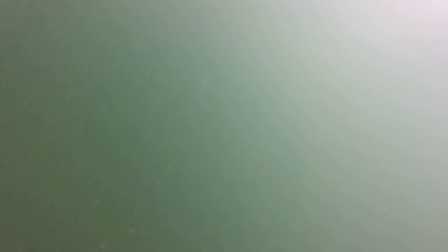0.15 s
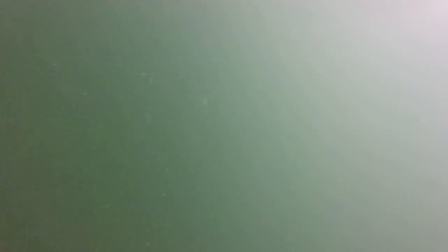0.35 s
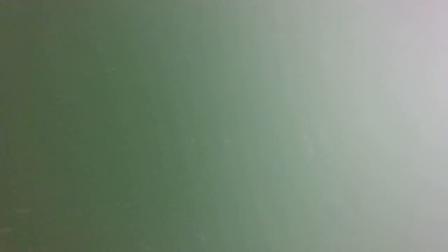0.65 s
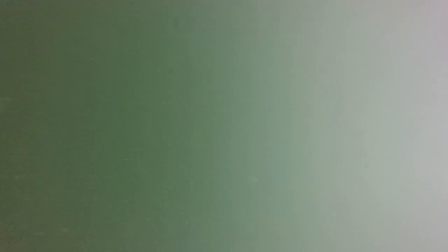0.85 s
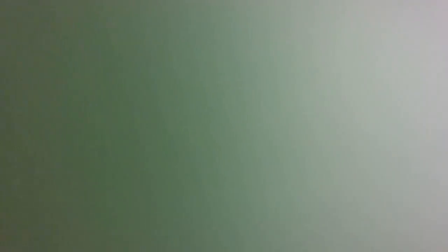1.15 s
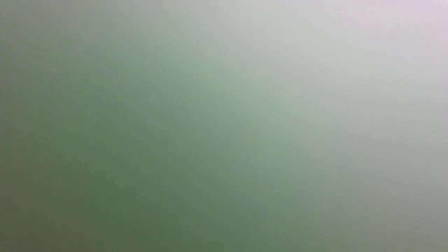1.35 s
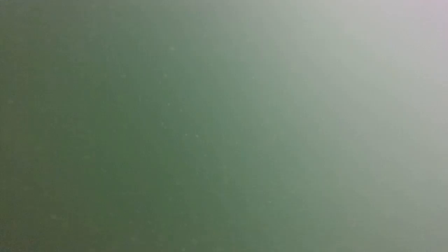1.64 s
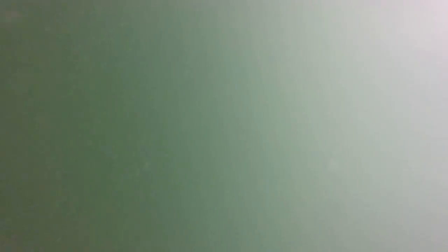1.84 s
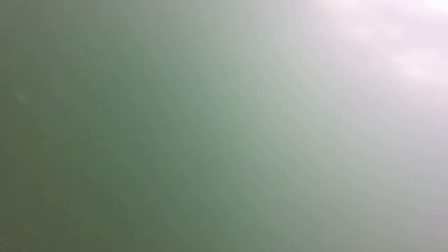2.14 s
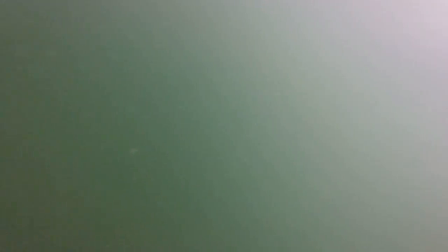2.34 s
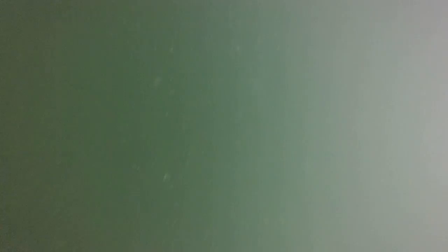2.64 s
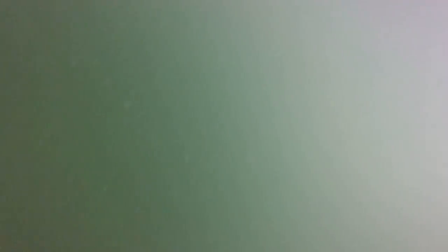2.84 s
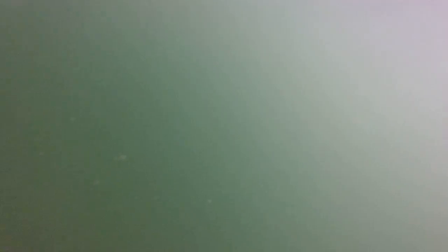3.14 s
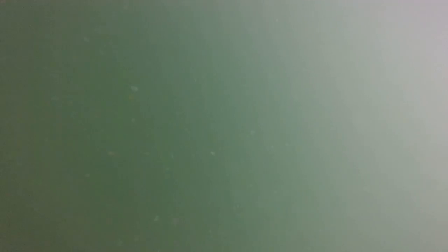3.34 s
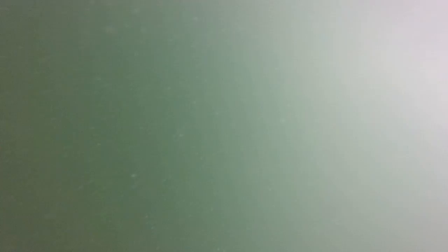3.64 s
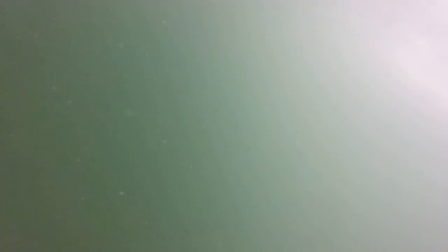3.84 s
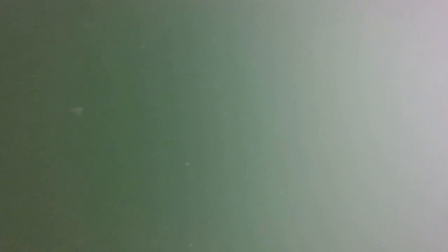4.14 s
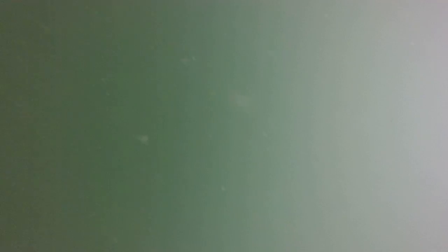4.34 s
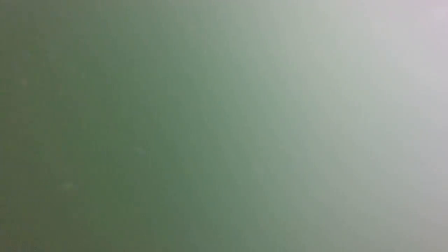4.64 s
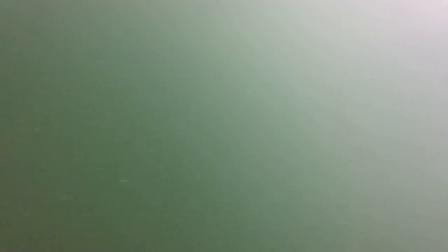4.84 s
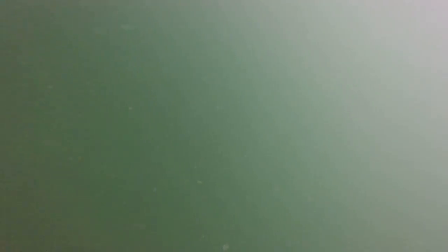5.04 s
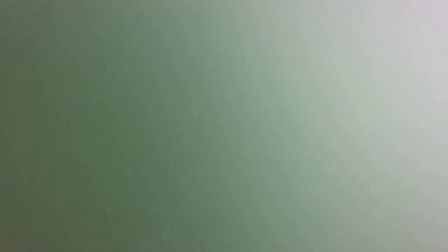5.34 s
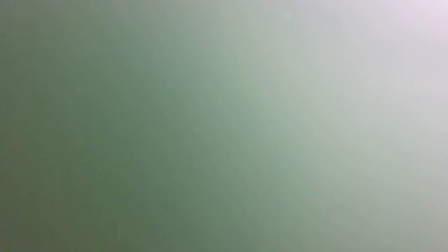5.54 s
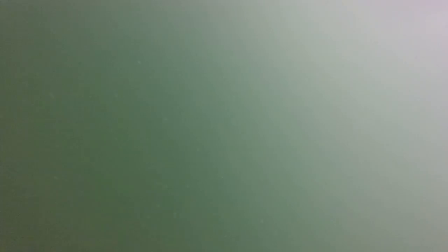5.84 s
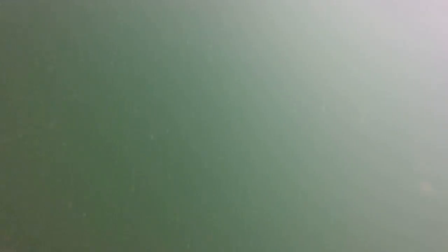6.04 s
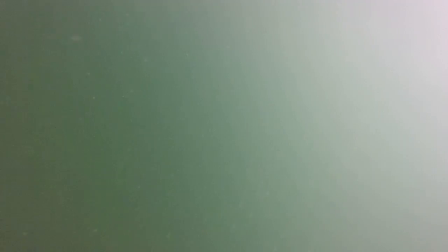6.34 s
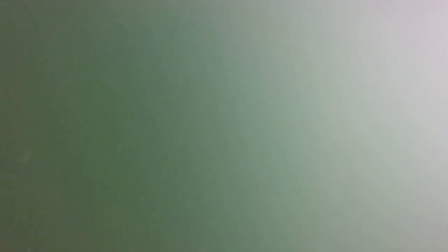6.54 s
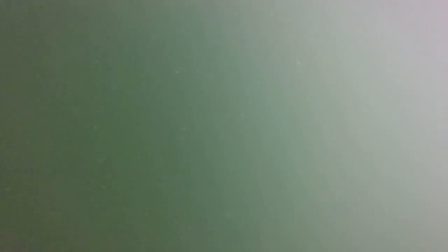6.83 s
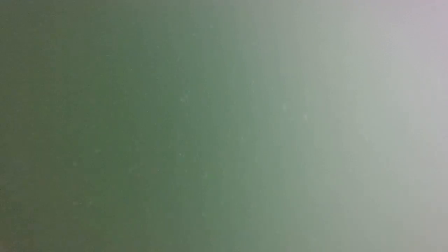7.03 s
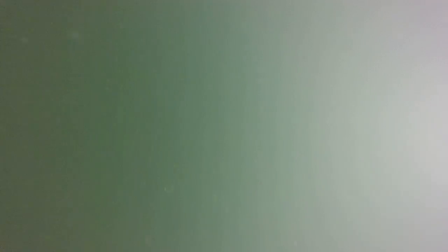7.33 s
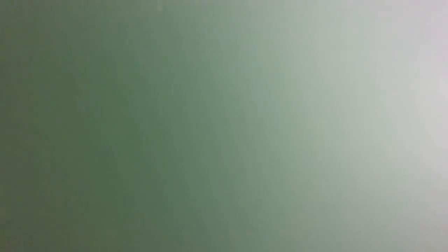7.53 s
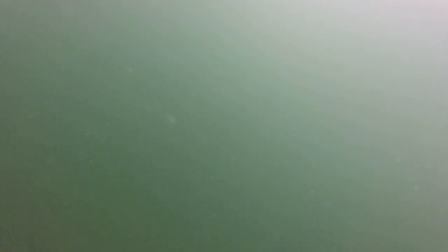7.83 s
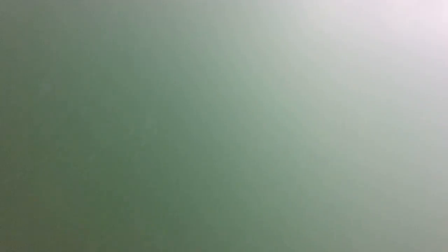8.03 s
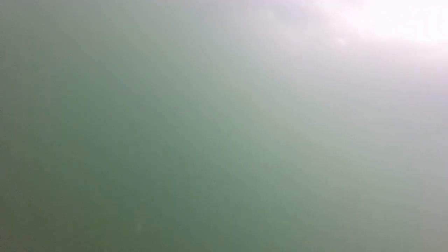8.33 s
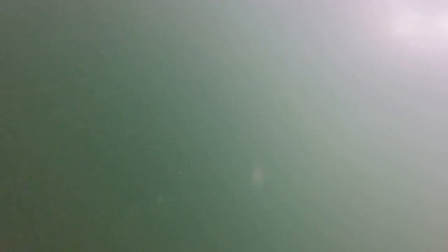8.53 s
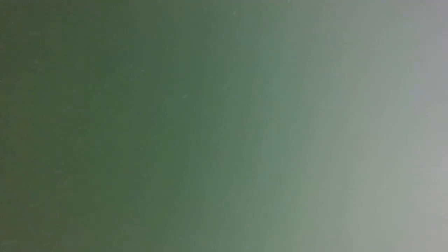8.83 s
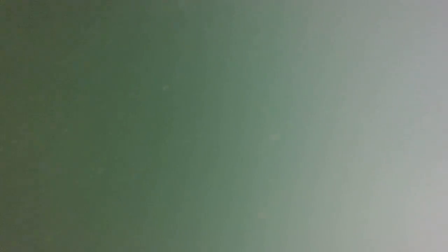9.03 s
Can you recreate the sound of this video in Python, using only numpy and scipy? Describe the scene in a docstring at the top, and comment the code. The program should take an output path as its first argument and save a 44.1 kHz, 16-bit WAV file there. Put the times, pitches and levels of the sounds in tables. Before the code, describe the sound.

Roughly nine seconds underwater off a pier, heard in mono through the wall of a waterproof case. Throughout, snapping shrimp make a dense, irregular crackle like frying fat: faint far ticks, thin bright clicks and nearer snaps with a brief, hard, boxy ring and ragged short scatter. Strong snaps stand out near 0.3, 2.4, 2.8, 3.6 and 5.6 s, the last two and the first loudest; others come singly or in tight clusters. The crackle swells and thins unevenly, busier around 2.2 and 3 s. Small rounded water gulps, low-mid and rising quickly in pitch, start near 1.5 s, with a clear one at 1.85 s, return from 3 s and become frequent between 6.5 and 8.2 s, with another at 8.7 s. Tiny gurgling plops, surging a little near 5 s, a dull low wash and a faint even hiss continue to the end.

```python
"""Snapping shrimp under a pier

A camera in a waterproof case hangs in the water. Shrimp crackle all around: each snap is a pressure
spike, trailed by noisy scatter from piles and seabed, that rings the modes of the case.
Small waves gulp at the surface as gliding sine bursts with a slosh of noise, over gurgling made of
tiny filtered plops. A dull wash of water and a faint hiss are steady coloured noise."""
import sys
import numpy as np
from scipy import signal
from scipy.fft import rfft, irfft, next_fast_len
from scipy.io import wavfile
from scipy.ndimage import map_coordinates

SR = 44100
rng = np.random.default_rng(int(sys.argv[2]) if len(sys.argv) > 2 else 0)


def unload_wav(signal):
    """Save mono or channel-first audio to the path in sys.argv[1] as 16-bit WAV at rate SR, clipped to [-1, 1]."""
    wavfile.write(
        sys.argv[1],
        SR,
        np.round(np.clip(np.atleast_2d(signal).T, -1, 1) * 32767).astype(np.int16),
    )


N = 404838  # samples

# near shrimp snaps: t/s, level/dB, treble lift/dB, upper against lower case modes/dB
NEAR_SNAPS = [(0.0101, -36.5, -18, -12.5), (0.103, -43, 12, 6), (0.113, -46.5, 8.5, -8),
              (0.276, -25.5, -2, -0.5), (0.4499, -34.0, 2.5, 0.5), (0.474, -49, 2.5, -2),
              (0.5032, -45.5, 4, 2), (0.634, -40.5, 13.5, -7.5), (0.8168, -36.0, -0.5, 4.5),
              (0.885, -42.0, -1, 2), (1.0494, -50, 13, -4), (1.2755, -43.5, 0, -4),
              (1.3113, -44.5, 3, -1.5), (1.3214, -45, 16.5, -3), (1.362, -51.5, 24, 0), (1.413, -42, 10, 0),
              (1.5077, -41.5, 2, 0), (1.8623, -46.5, 35, 4), (1.9822, -37.5, 14.5, -2),
              (2.0142, -43, 2, -1), (2.077, -42, -5, 2), (2.1619, -42.5, 5.5, -3), (2.3254, -42, 7, 10),
              (2.3796, -40.5, 0, 6), (2.4028, -29.0, -1, 0), (2.4168, -48, 20, 3), (2.4316, -42, 2, 0),
              (2.4513, -42.5, 4, -8), (2.495, -41.5, 3.5, 8), (2.5287, -42, 4, 7), (2.5396, -44, 4, -8),
              (2.7745, -30.5, 2, -6), (2.8242, -35.5, 1, -3), (2.9147, -43, 3, -9.5),
              (3.0219, -45.5, -1, -5), (3.0514, -41.0, 6.5, -23), (3.075, -47, 16, 11), (3.1332, -40, 0, 4),
              (3.183, -35.5, 5.5, 10), (3.251, -45.5, -14, -0.5), (3.2645, -45, 6, 7),
              (3.2995, -41.5, 14, -2), (3.4452, -36.0, 7, 7.5), (3.5592, -25, 1.5, -1),
              (3.6868, -45.5, 21, -11.5), (3.749, -48, 9, 2.5), (3.8095, -42, 6, -11),
              (3.858, -40, 1, -5.5), (3.8983, -45.0, 2, 0), (4.0254, -45, 4, 4), (4.2838, -46.5, 10, 2),
              (4.3923, -43, 3, 11), (4.5444, -36, 1.5, 0), (4.559, -38, -4, 1), (4.5873, -43.5, 3, 5),
              (4.6945, -40, 0, 6), (4.7349, -47, 5.5, -3), (4.7465, -36, -1, 8), (4.964, -46.5, 4, -8),
              (5.08, -46, 4, 2), (5.1316, -48, -1.5, 14), (5.341, -41.5, 4, -7), (5.398, -41.5, 6, 8),
              (5.4278, -41.5, 2, 2), (5.508, -40.5, 12.5, -5), (5.6293, -39.5, -5, -8),
              (5.6387, -24.5, -5, 7.5), (5.8876, -34, -1, 2.5), (5.913, -39, 5, 9), (6.1137, -44, 10, 8),
              (6.179, -38.5, 5.5, -8.5), (6.366, -41.5, 8, 3), (6.4081, -41.5, 5, 8), (6.4848, -42.5, 3, 6),
              (6.4952, -44, 4, -3), (6.5455, -45, 14.5, 6), (6.5623, -42, 1, 6), (6.9103, -39.5, 7.5, 4),
              (6.926, -43, 10.5, -4), (7.0494, -44.5, 11.5, -7), (7.184, -41.5, 15, -1),
              (7.2484, -36.5, 3, 6.5), (7.286, -45, -1, 2), (7.311, -41, 5, -16), (7.415, -34, -0.5, -3.5),
              (7.552, -40, 12, 7), (7.5641, -41, 12, -4.5), (7.6197, -47, 17, 17), (7.7423, -41.0, 6, -14),
              (7.9041, -39, -3, 2), (7.9552, -44, -1, 8), (7.9866, -34.5, -10, -15),
              (8.0032, -38.5, 2.5, 2), (8.1883, -40.5, 5, 4.5), (8.2183, -41.5, 6.5, 4),
              (8.4887, -43.5, -13, 12.5), (8.6812, -42.5, 11, -11), (8.802, -42, 19, 2),
              (8.9955, -47, 29, -5)]
# activity of the shrimp colony: t/s, crackle level/dB
COLONY_ACTIVITY = [(0.0, -54), (0.33, -61.5), (2.07, -57), (2.17, -54), (2.76, -63.5), (2.96, -55.5),
                   (4.34, -59.5), (4.73, -56), (5.01, -60.5), (6.26, -55.5), (6.62, -59), (8.54, -56.5),
                   (9.18, -58.5)]
# colour of air and water moving at the surface: f/Hz, relative level/dB
GURGLE_COLOUR = [(120, -13), (260, 1.5), (330, 1), (470, -2), (570, 3), (625, -3.5), (710, 3.5), (820, -4),
                 (1000, -12.5), (1400, -36)]


def amp(db):
    """Amplitude factor of a level in dB."""
    return 10 ** (np.asarray(db) / 20)


def unit(x):
    """Scale to rms 1."""
    return x / np.sqrt(np.mean(x ** 2) + 1e-20)


def along(points, hz):
    """Interpolate (Hz, value) points on a log frequency axis."""
    f, value = np.transpose(points)
    return np.interp(np.log(hz + 1), np.log(f + 1), value)


def curve(rows):
    """One value per sample from (s, value) rows."""
    return np.interp(np.arange(N) / SR, *np.transpose(rows))


def filtered(x, response):
    """Multiply the spectrum of x by a response of frequency."""
    size = next_fast_len(len(x) + SR // 2)
    spectrum = rfft(x, size) * response(np.fft.rfftfreq(size, 1 / SR))
    return irfft(spectrum, size)[:len(x)]


def gurgle_coloured(x):
    """Give x the colour of water gurgling at the surface."""
    return filtered(x, lambda hz: amp(along(GURGLE_COLOUR, hz)))


def noise(spectrum):
    """Steady coloured noise of rms 1."""
    return unit(filtered(rng.standard_normal(N), lambda hz: amp(along(spectrum, hz))))


def add(track, s, sound):
    """Mix a sound in at time s."""
    start = int(np.clip(round(s * SR), 0, N - 1))
    track[start:start + len(sound)] += sound[:N - start]


def case_ring(treble_db, lean_db, ripple_db, split_hz=3900, middle_hz=2350, reach_hz=520,
              ripple_hz=1300, smear_t60=0.0043, size=2048):
    """Ring of the case for one spike; the direction it comes from decides which modes take it up."""
    # what the case lets through of a snap: f/Hz, level/dB
    case_response = [(100, -22), (400, -38), (800, -5.5), (1100, -19.5), (1500, -12.5), (1660, 1),
                     (2000, 1), (2750, 5.5), (3150, 3), (4300, -12.5), (5600, -9.5), (7000, -17.5),
                     (9500, -26.5), (13500, -33), (16000, -71)]
    # resonances and dips of the case: f/Hz, width/Hz, level/dB
    case_modes = [(1395, 69, 7.5), (1800, 204, 9.5), (1904, 54, -7.5), (2243, 190, 6), (2329, 31, -9),
                  (2450, 44, 6), (3326, 115, -18), (3700, 510, 0.5), (4594, 150, -9.5), (5200, 540, 2.5),
                  (6590, 135, -16.5), (11500, 330, -5.5)]
    hz, t = np.fft.rfftfreq(size, 1 / SR), np.arange(size) / SR
    db = along(case_response, hz)
    db += sum(gain / (1 + (2 * (hz - f) / width) ** 2) for f, width, gain in case_modes)
    # the main modes lean up or down
    offset = (hz - middle_hz) / reach_hz
    db += lean_db / 2 * offset * np.exp((1 - offset ** 2) / 2)
    # the treble has random hills and hollows
    ripple = map_coordinates(rng.standard_normal(size), [hz / ripple_hz])
    db += ripple_db * ripple * np.clip(2 * hz / split_hz - 2, 0, 1)
    # the wall rings only after it is struck: minimum phase
    cepstrum = irfft(np.log(amp(db)))
    cepstrum[1:size // 2] *= 2
    cepstrum[size // 2 + 1:] = 0
    ring = irfft(np.exp(rfft(cepstrum)))
    # short waves run around the case by many routes, which smears the treble
    smear = rng.standard_normal(size) * amp(-60 * t / smear_t60)
    smeared = signal.fftconvolve(ring, smear / np.linalg.norm(smear))[:size]
    body = signal.lfilter(*signal.butter(4, split_hz, fs=SR), ring)
    treble = signal.lfilter(*signal.butter(6, split_hz, "high", fs=SR), smeared)
    return body + amp(treble_db) * treble


def arrival(scatter_db, pile_t60=.016, tail_db=-16, tail_t60=0.11, echo_db=3, echo_rate=450, rise=0.00068):
    """A spike, then ragged echoes from the piles and a fainter tail from seabed and surface."""
    t = np.arange(SR // 12) / SR
    echoes = amp(echo_db * map_coordinates(rng.standard_normal(len(t)), [t * echo_rate]))
    decay = amp(-60 * t / pile_t60) + amp(tail_db - 60 * t / tail_t60)
    onset = 1 - np.exp(-t / rise)
    path = rng.standard_normal(len(t)) * echoes * decay * onset
    path *= amp(scatter_db) / np.linalg.norm(path)
    path[0] += 1  # the direct spike
    return path


def snap(db, treble_db, lean_db, scatter_db, level_s=0.012):
    """One snap as the case passes it on, with rms level db over its first level_s seconds."""
    sound = signal.fftconvolve(arrival(scatter_db), case_ring(treble_db, lean_db, ripple_db=3.0))
    return amp(db) * sound / np.sqrt(np.mean(sound[:round(level_s * SR)] ** 2))


def lesser_snap(small, lean, level_db=-48, range_db=6, treble_db=4, brighter_db=15, lean_db=6, scatter_db=-4):
    """The smaller the claw (0-1), the weaker and brighter its snap; lean (0-1) is its direction."""
    treble = treble_db + brighter_db * small ** 2
    return snap(level_db - range_db * small, treble, lean_db * (2 * lean - 1), scatter_db)


def crackle(per_second, spread_db, treble_db, scatter_db, ripple_db, lean_db=6, colour_db=4, count=45):
    """Random snaps, together of rms 1, from many spots, each spot with its own path and colour."""
    spots = []
    for bright, lean in rng.standard_normal((count, 2)):
        ring = case_ring(treble_db + colour_db * bright, lean_db * lean, ripple_db)
        spots.append(unit(signal.fftconvolve(arrival(scatter_db), ring)))
    track = np.zeros(N)
    for when, spot, weakness in rng.random((int(per_second * N / SR), 3)):
        # few snaps are strong, most are faint
        strength_db = -spread_db * np.log(weakness + 0.032)
        add(track, when * N / SR, amp(strength_db) * spots[int(spot * count)])
    return unit(track)


def far_shrimp(bed_db=-3.0, ticks_db=-9.5):
    """The rest of the colony: a dense far bed, and thin bright ticks of small shrimp closer by."""
    bed = crackle(per_second=190, spread_db=3.5, treble_db=9.5, scatter_db=3, ripple_db=2.5)
    ticks = crackle(per_second=60, spread_db=4, treble_db=19, scatter_db=-6, ripple_db=5.5)
    return amp(curve(COLONY_ACTIVITY)) * (amp(bed_db) * bed + amp(ticks_db) * ticks)


def gurgling(per_second=140, spread_db=1.0, level_db=-3.0, surge_db=2.5, surge_rate=9):
    """Many tiny plops run together in surges as the surface churns."""
    # churning at the surface, before level_db: t/s, level/dB
    churning = [(0.0, -58), (4.73, -56), (4.94, -52.5), (5.47, -56.5), (6.54, -55.5), (6.88, -55),
                (7.29, -58), (8.49, -55), (9.18, -57.5)]
    sizes = amp(spread_db * np.minimum(rng.standard_normal(N), 1)) * rng.choice([-1, 1], N)
    plops = sizes * (rng.random(N) < per_second / SR)
    surges = amp(surge_db * map_coordinates(rng.standard_normal(SR), [np.arange(N) / SR * surge_rate]))
    return amp(curve(churning) + level_db) * unit(surges * gurgle_coloured(plops))


def water(wash_db=-54.5, hiss_db=-64.0):
    """The dull wash of moving water and the even hiss behind the crackle."""
    # wash of the water: f/Hz, relative level per Hz/dB
    wash_spectrum = [(15, -2), (40, 2.5), (80, 2.5), (150, 1), (270, -4.5), (540, -5.5), (730, -5.5),
                     (950, -12), (1400, -13), (2500, -31), (6000, -63)]
    # steady hiss: f/Hz, relative level per Hz/dB
    hiss_spectrum = [(900, -31), (1500, -4.5), (1800, 3), (3000, -4.5), (4400, -7), (5400, -11),
                     (7000, -11), (10000, -17.5), (13500, -24), (16000, -58)]
    return amp(wash_db) * noise(wash_spectrum) + amp(hiss_db) * noise(hiss_spectrum)


def near_shrimp(close_scatter_db=-7, scatter_grows=0.29, shadow_grows=0.44):
    """Single snaps that stand out: the loudest are a clean spike, fainter ones often ragged."""
    track, loudest_db = np.zeros(N), np.max(np.array(NEAR_SNAPS)[:, 1])
    shadows = rng.random(len(NEAR_SNAPS)) ** 2
    for (s, db, treble_db, lean_db), shadow in zip(NEAR_SNAPS, shadows):
        # a fainter snap comes from farther off and is more often shadowed by a pile,
        # so more of it arrives as scatter (growth in dB per dB below the loudest)
        scatter_db = close_scatter_db + (scatter_grows + shadow_grows * shadow) * (loudest_db - db)
        add(track, s, snap(db, treble_db, lean_db, scatter_db))
    return track


def flurries(share=0.5, wait_s=0.014, within_s=0.045, level_db=1):
    """Snaps come in clusters: a lesser one often follows hard on a near one."""
    track = np.zeros(N)
    for (s, *_), (chance, when, small, lean) in zip(NEAR_SNAPS, rng.random((len(NEAR_SNAPS), 4))):
        follows = chance < share
        add(track, s + wait_s + within_s * when, follows * lesser_snap(small, lean))
    return amp(level_db) * track


def neighbour_shrimp(count=115):
    """Lesser snaps all the way through, crowding when the colony is busy."""
    track, busy = np.zeros(N), np.cumsum(amp(curve(COLONY_ACTIVITY)))
    for k, (when, small, lean) in enumerate(rng.random((count, 3))):
        # equal shares of the summed activity put more snaps where it is high
        s = np.searchsorted(busy, (k + when) / count * busy[-1]) / SR
        add(track, s, lesser_snap(small, lean))
    return track


def gulp(hz, cycles=0.93, glide=10, slosh=0.26, slosh_t60=0.077):
    """An air pocket swings briefly, rising in pitch, and water sloshes after it; the peak is 20 ms in."""
    t = np.arange(SR // 8) / SR - .02
    phase = hz * t * (1 + glide * t) + rng.random()
    swing = np.exp(-np.abs(t * hz / cycles) ** 1.8) * np.sin(2 * np.pi * phase)
    churn = unit(gurgle_coloured(rng.standard_normal(len(t))))
    after = amp(-60 * np.abs(t) / slosh_t60) / (1 + np.exp(-t * hz))
    return swing + slosh * churn * after


def lapping(peak_db=4.5, small_db=-47.0, spread_db=-0.5, small_hz=470, spread_hz=120, start_s=2.7, count=28):
    """Clear gulps of small waves, and lesser ones from start_s, heard through the wall of the case."""
    # gulps at the surface, before peak_db and the wall: t at the peak/s, level/dB, f at the peak/Hz
    clear_gulps = [(1.519, -42, 604), (1.688, -41.5, 566), (1.751, -43.5, 490.0), (1.854, -33.5, 704),
                   (3.042, -44, 393), (3.214, -43.5, 550.0), (3.294, -44.5, 497), (3.476, -37.5, 456),
                   (3.495, -45, 464), (4.002, -39.5, 417), (4.117, -37, 600.0), (4.235, -44, 570.0),
                   (4.349, -43, 527), (4.87, -43, 440), (4.942, -47.5, 410.0), (5.302, -41.5, 444),
                   (5.674, -40.5, 554), (5.754, -44.5, 506), (5.968, -47.5, 366), (6.047, -43, 367),
                   (6.288, -43, 560.0), (6.543, -40.5, 554), (6.808, -37.5, 550.0), (6.82, -40, 510),
                   (6.967, -36.5, 414), (7.039, -40, 630.0), (7.211, -38.5, 540), (7.591, -43, 470.0),
                   (7.682, -41, 650.0), (7.88, -38.5, 397), (8.048, -39.5, 596), (8.124, -35, 630),
                   (8.68, -36, 650)]
    lesser = []
    for when, size, pitch in rng.random((count, 3)):
        s = start_s + when * (N / SR - start_s)
        lesser.append((s, small_db + spread_db * (2 * size - 1), small_hz + spread_hz * (2 * pitch - 1)))
    track = np.zeros(N)
    for s, db, hz in list(clear_gulps) + lesser:
        add(track, s - .02, amp(db) * gulp(hz))  # the peak falls on s
    return amp(peak_db) * gurgle_coloured(track)


def scene():
    """All shrimp, surface and water layers summed to one channel."""
    shrimp = far_shrimp() + near_shrimp() + flurries() + neighbour_shrimp()
    return (shrimp + gurgling() + water() + lapping())[None]


def record(dry, top_hz=15800):
    """The camera keeps nothing above its band limit."""
    return filtered(dry[0], lambda hz: hz < top_hz)[None]


dry = scene()
out = record(dry)
unload_wav(out)
```